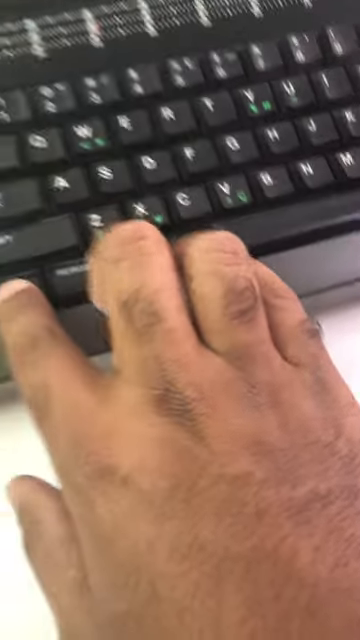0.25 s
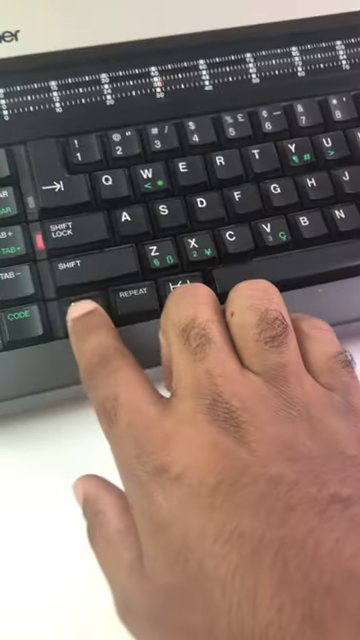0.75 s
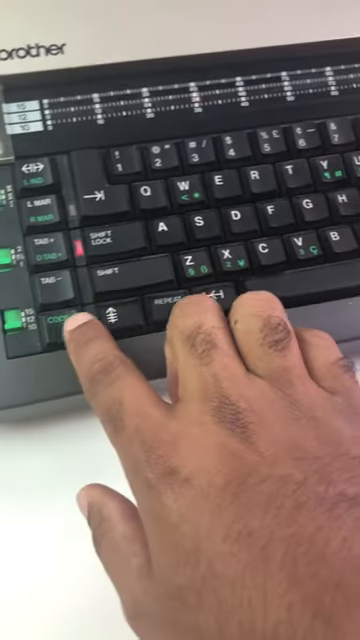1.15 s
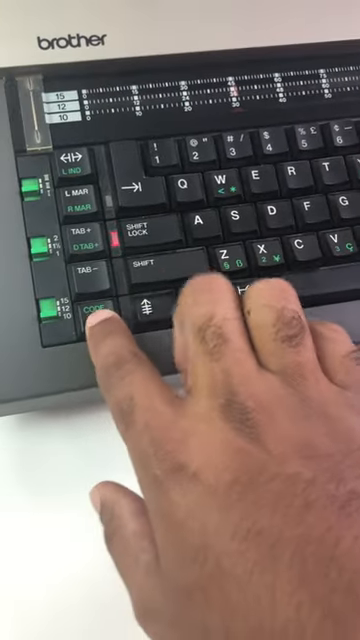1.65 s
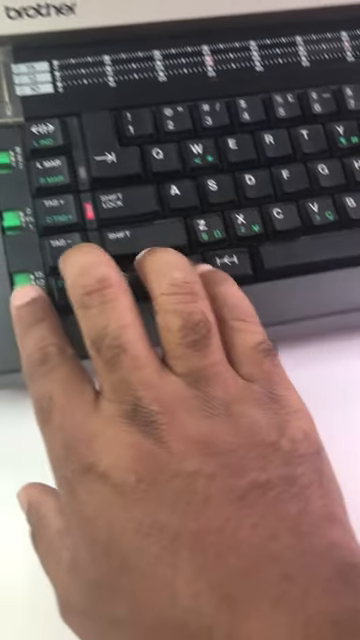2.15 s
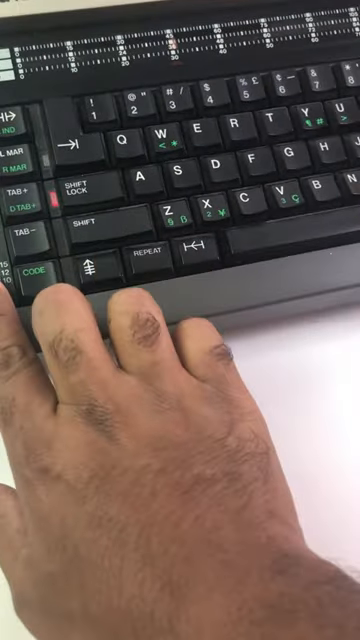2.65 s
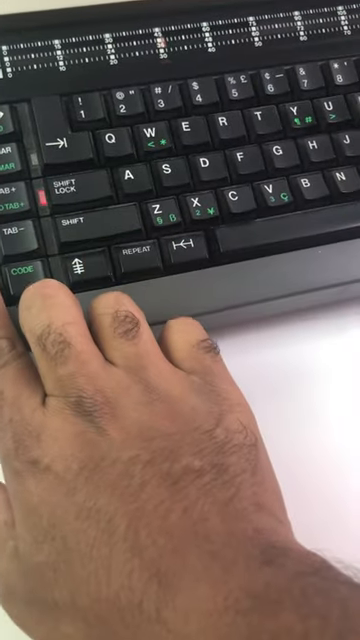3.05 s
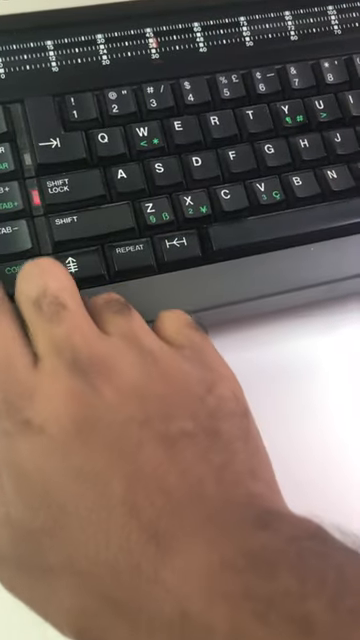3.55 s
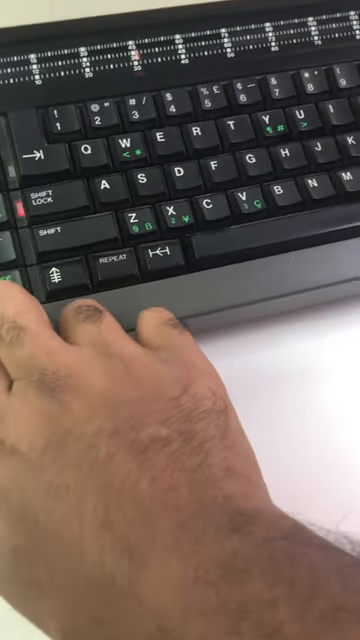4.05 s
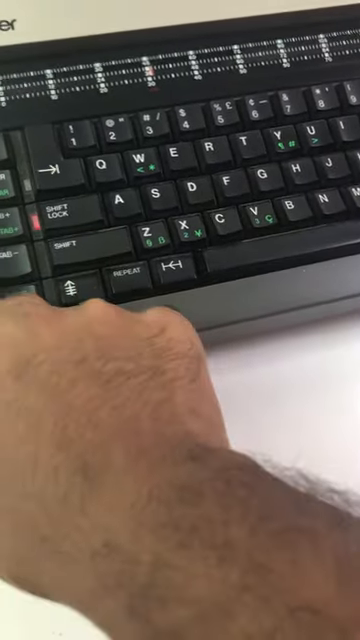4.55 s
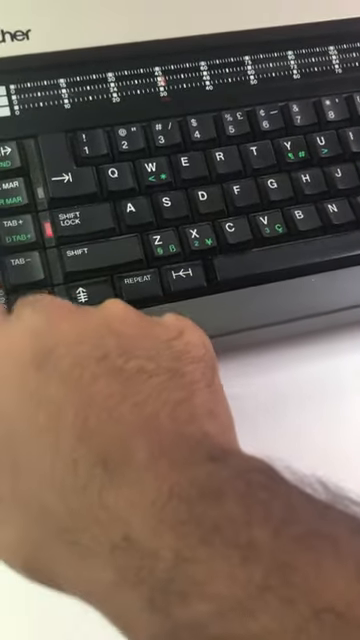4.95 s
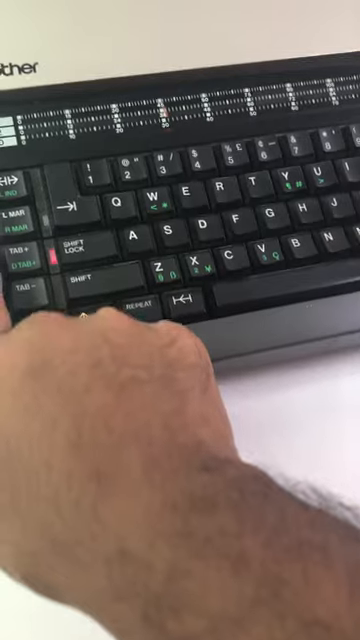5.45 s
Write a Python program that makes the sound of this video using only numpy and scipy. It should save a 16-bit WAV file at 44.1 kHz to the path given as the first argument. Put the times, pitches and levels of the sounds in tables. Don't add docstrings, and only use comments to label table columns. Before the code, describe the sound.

Quiet room air with faint hum opens, joined by a barely audible high whistle that soon stops. Soft, cushioned key contacts patter briefly, followed by sparse touches and tiny fingertip squeaks. Then small switches snap sharply, with bright ticks, plastic rattle and dull desk thumps, unevenly spaced and stronger near the end. Close phone pickup, mono, short room reflections, level dipping slightly after loud blows.

```python
import sys
import numpy as np
from scipy import signal
from scipy.fft import rfft, irfft, next_fast_len
from scipy.io import wavfile
from scipy.ndimage import uniform_filter1d, map_coordinates

SR = 44100
rng = np.random.default_rng(int(sys.argv[2]) if len(sys.argv) > 2 else 0)


def makeup_ratio(level_db):
    decades = np.asarray(level_db, float) / 20
    return 10 ** decades


def file_out(sig):
    cols = np.atleast_2d(sig).T
    lim = np.clip(cols, -1, 1)
    pcm = np.round(lim * 32767).astype(np.int16)
    wavfile.write(sys.argv[1], SR, pcm)


N = 251811

# pitch_hz, density_db (per Hz)
RUMBLE_COLOUR = [(12, -61), (20, -60), (48, -6), (81, -10), (168, -2), (261, -6), (296, -11), (397, -9.5),
                 (435, -12), (1600, -23.5), (2080, -37), (3520, -120)]
HISS_COLOUR = [(590, -32), (1000, -52), (1300, 8.5), (1460, -9), (1800, -3), (2380, -4.5), (2890, -5.5),
               (4140, -9.5), (4590, -11), (15800, -23.5)]
# pitch_hz, width_hz, level_db
HUMS = [(63, 13, -78.5), (219, 30, -81), (295.3, 11, -69.5), (868, 18, -76.5), (1240, 9.6, -84.5),
        (2496, 14, -85)]
# pitch_hz, stop_s, level_db
WHISTLE = (14890, 0.43, -88)
# time_s, level_db
NEARNESS = [(0, -1), (.7, 0), (1.05, 1.5), (1.4, -.5), (2.4, -0.5), (5.71, 1.5)]
# pitch_hz, t60_s
ROOM_DECAY = [(100, 1), (500, 0.28), (2000, 0.2), (6000, 0.24), (15000, 0.11)]
# start_s, level_db, rise_s
PUSHES = [(.93, -51, 0.017), (1.04, -51.5, 0.019), (1.159, -53, 0.031), (2.54, -60.5, 0.013),
          (2.898, -50, .008), (3.3484, -30.5, 0.0011), (3.362, -46, 0.013), (3.8, -54.5, 0.02),
          (4.08, -59.5, .018), (4.62, -57, 0.015), (4.82, -50, 0.02), (5.4, -55, 0.015), (5.54, -51, 0.014)]
# centre_s, length_s, pitch_hz, width_hz, level_db
SQUEAKS = [
    (1.553, 0.02, 9500, 700, -69.5),
    (1.55, .03, 15000, 1210, -74),
    (1.737, 0.034, 9360, 500, -75.5),
    (1.86, 0.078, 15400, 500, -82),
    (1.895, 0.11, 9600, 300, -84),
    (2.27, 0.041, 13000, 1800, -76),
    (2.33, .025, 15100, 900, -75),
    (3.55, 0.022, 13200, 1800, -67.5),
    (4.317, 0.02, 13000, 1200, -62.5),
    (5.003, 0.011, 13200, 1800, -70),
]
# start_s, clack_db, tick_db (hardness, over the clack), knock_db (weight, over the clack)
SOFT_KEYS = [(0.8452, -60.5, -18, -3), (0.8709, -45.5, -9.5, -13), (0.9053, -54, -18, -2),
             (0.9179, -48.5, -17, -1), (0.9385, -50.5, -16, -3.5), (1.0132, -45, -16, -1.5),
             (1.0275, -46.5, -12, -3), (1.046, -52, -13, -2), (1.1192, -53, 3, 4),
             (1.1537, -50.5, -18, 3.5), (1.1593, -57, -27, 2.5), (1.5474, -49, -10, -10.5),
             (1.7036, -76, 10, -12), (1.7551, -63, -14, 8.5), (2.0113, -53.5, -8, 5), (2.022, -65, -5, 11),
             (2.0463, -60, -20, -18), (2.3242, -75, 9, 7), (2.6612, -53, -17, 0.5), (2.7304, -66, -18, -2)]
SLIDE_SWITCHES = [(2.8116, -37, -2.5, -12), (2.82, -33.5, -7.5, -6), (2.8932, -31.5, 3, -4.5),
                  (3.3284, -32, -4, -9), (3.3549, -30.5, 3.5, -11), (3.5271, -51, -40, 3.5),
                  (3.702, -55.5, -28, -4), (3.7932, -36, -7.5, -10), (3.8885, -29.5, 2.5, -1.5),
                  (4.0275, -36, -3.5, -9.5), (4.0669, -27.5, 0, -22), (4.2687, -55, -20, 0.5),
                  (4.2958, -44.5, -12, -16), (4.318, -63, -12, 14), (4.4853, -52.5, -1, 6),
                  (4.5028, -47, -30, -2), (4.5228, -37.5, -1.5, -12.5), (4.5957, -28.5, 0.5, -3.5),
                  (4.6219, -36.5, 1, -18), (4.8049, -27.5, 8, -21.5), (4.923, -47.5, -43, -6),
                  (4.9715, -51, -25, -3), (4.979, -60, -2, 3), (4.984, -48.5, -46, -15),
                  (5.231, -59.5, -17, 4.5), (5.2576, -30, -25, -11.5), (5.2664, -40, -2.5, -6.5),
                  (5.3757, -26, 1.5, -5.5), (5.5177, -17, 3.5, -11), (5.7044, -47, -17.5, -7)]
LIGHT_TOUCHES = [(2.542, -63, -21, -13), (3.7645, -56, -6, -11), (4.782, -71, 2, 10),
                 (3.3259, -44.5, -14, -2), (3.3458, -37.5, -3, -5), (3.7866, -37.5, -23, -12),
                 (3.883, -47, -19, -10), (4.012, -65, -15, -18), (4.065, -34, -1, 1.5),
                 (4.5877, -46, -15, -3), (4.7999, -28.5, -10, -2.5), (5.3742, -32.5, -38, -2.5)]
# pitch_hz, width_hz, level_db
DETENT_MODES = [(5790, 270, -20), (7450, 1170, -18), (9240, 700, -17.5), (9820, 700, -22.5),
                (11590, 1430, -10.5), (13000, 4800, -13.5), (15000, 1070, -12.5)]
SLIDER_MODES = [(2595, 67, 0.5), (3000, 290, 6), (3383, 790, 1.5), (4160, 1400, -4.5), (4553, 105, -6),
                (4800, 1100, -11)]
CASE_MODES = [(1270, 118, 1), (1710, 700, 1), (2000, 130, -3), (1920, 390, 2), (2377, 360, 5.5)]
DECK_MODES = [(447, 35, -2.5), (548, 55, -4), (749, 146, -1), (947, 53, 1.5), (1039, 250, -4.5)]
DESK_MODES = [(101.2, 19.7, 7.5), (163, 64, -0.5), (245, 26.6, 7), (354, 97, 2)]
# delay_s, contact_s, level_db, chatter_t60_s, chatter_db
BLOWS = [
    (.0006, 0.00019, 5, 0.035, -16.5),
    (.001, 0.0007, 4.5, 0.046, -11),
    (.0012, 0.00062, 1, 0.057, -15),
    (.0012, .001, 3.5, .08, -10),
    (.0018, 0.0038, 2.5, 0.13, -3),
]

TAIL = 12000
USUAL_DB = -46
TOP_HZ, LOUD_TOP_HZ = 15800, 16800


def unit(x):
    return x / np.sqrt(np.mean(x ** 2) + 1e-20)


def along(points, hz):
    f, value = np.transpose(points)
    return np.interp(np.log(hz + 1), np.log(f + 1), value)


def wobble(rate_hz):
    knots = rng.standard_normal(int(N * rate_hz / SR) + 4)
    return map_coordinates(knots, [np.arange(N) * rate_hz / SR])


def filtered(x, response):
    size = x.shape[-1]
    m = next_fast_len(size + 8192)
    spectrum = rfft(x, m) * response(np.fft.rfftfreq(m, 1 / SR))
    return irfft(spectrum, m)[..., :size]


def peak(f, hz, width_hz):
    return 1j * f * width_hz / (hz * hz - f * f + 1j * f * width_hz)


def modes(f, table):
    return sum((-1) ** k * makeup_ratio(db) * peak(f, hz, width) for k, (hz, width, db) in enumerate(table))


def narrow_noise(hz, width_hz):
    return unit(filtered(rng.standard_normal(N), lambda f: peak(f, hz, width_hz) ** 2))


def ventilation():
    z = signal.stft(rng.standard_normal((2, N)), nperseg=512)[2]
    patches = uniform_filter1d(rng.standard_normal(z.shape[1:]), size=6, axis=0)
    patches = uniform_filter1d(patches, size=12, axis=1)
    low, high = signal.istft(z * makeup_ratio(0.9 * unit(patches)), nperseg=512)[1][:, :N]

    def hiss_response(f):
        rumble_share = 1 / (1 + (f / 1400) ** 8)
        return makeup_ratio(along(HISS_COLOUR, f)) * np.sqrt(1 - rumble_share) * (f < TOP_HZ)

    rumble = unit(filtered(low, lambda f: makeup_ratio(along(RUMBLE_COLOUR, f))))
    hiss = unit(filtered(high, hiss_response))
    gusts_db = 0.7 * wobble(6)
    near_db = np.interp(np.arange(N) / SR, *np.transpose(NEARNESS))
    drift_db = 1.4 * wobble(1.385)
    return makeup_ratio(near_db + drift_db) * (makeup_ratio(-61.5 + gusts_db) * rumble + makeup_ratio(-71) * hiss)


def hums():
    return sum(makeup_ratio(db) * narrow_noise(hz, width_hz) for hz, width_hz, db in HUMS)


def whistle():
    t = np.arange(N) / SR
    hz, stop_s, db = WHISTLE
    fade = np.clip((stop_s - t) / 0.02, 0, 1)
    return makeup_ratio(db + 1.5 * wobble(14)) * np.sin(2 * np.pi * hz * t) * fade


def pushes():
    t = np.arange(N) / SR

    def band(f):
        low, high = 1j * f / 80, 1j * f / 300
        return (low / (1 + low) / (1 + high)) ** 2

    load = np.zeros(N)
    for start_s, db, rise_s in PUSHES:
        u = np.clip(t - start_s, 0, 1) / rise_s
        load += makeup_ratio(db) * u * np.exp(1 - u)
    swell = unit(filtered(rng.standard_normal(N), band)) * load
    shove = 0.76 * filtered(load, band)
    return swell - shove


def squeaks():
    t = np.arange(N) / SR
    out = np.zeros(N)
    for centre_s, length_s, hz, width_hz, db in SQUEAKS:
        puff = np.exp(-4 * ((t - centre_s) / length_s) ** 2)
        out += makeup_ratio(db) * narrow_noise(hz, width_hz) * puff
    return out


def echoes(count):
    hz, t, z = signal.stft(rng.standard_normal((count, TAIL)), SR, nperseg=256)
    decay = makeup_ratio(-60 * t / along(ROOM_DECAY, hz)[:, None])
    tails = signal.istft(z * decay, SR, nperseg=256)[1][:, :TAIL]
    return tails / np.linalg.norm(tails, axis=1, keepdims=True)


def detent(f):
    return modes(f, DETENT_MODES) * peak(f, 9400, 5600)


def slider(f):
    return modes(f, SLIDER_MODES) * peak(f, 3660, 4700)


def case(f):
    return modes(f, CASE_MODES) * peak(f, 900, 2200)


def deck(f):
    return modes(f, DECK_MODES) * peak(f, 550, 830)


def desk(f):
    return modes(f, DESK_MODES) * peak(f, 227, 620)


def bending(f):
    return np.exp(-1j * 0.3756 * np.sqrt(f) + 2j * np.pi * f * 0.000204)


def contacts(table, slack, sharp, loose_db, wet_db, snap_db, thump_db):
    start_s, clack_db, tick_db, knock_db = np.transpose(table)[:, :, None]
    count = len(table)
    strength_db = clack_db - USUAL_DB
    snap_db = snap_db + 0.29 * tick_db - 0.059 * strength_db
    thump_db = thump_db - 0.34 * strength_db + 0.2 * knock_db
    t = np.arange(TAIL) / SR
    rattle = rng.standard_normal((count, 5, TAIL))
    spurts = uniform_filter1d(rng.standard_normal((count, TAIL)), size=60, axis=1)
    spurts = makeup_ratio(5.3 * unit(spurts))
    bodies = (detent, slider, case, deck, desk)
    levels_db = (tick_db, snap_db, 0, knock_db, thump_db)
    hits, radiated = 0, 0
    for k, (body, over_db, settings) in enumerate(zip(bodies, levels_db, BLOWS)):
        delay_s, contact_s, db, chatter_t60_s, chatter_db = settings
        u = np.clip(t - delay_s, 0, None) / max(slack * contact_s, 1 / SR)
        chatter_db = chatter_db + loose_db - 0.077 * strength_db - 60 * t / chatter_t60_s
        chatter = spurts * makeup_ratio(chatter_db) * (1 - np.exp(-u))
        drive = rattle[:, k] * (u * np.exp(1 - u) + chatter)
        click = 1.0 * (np.arange(TAIL) == round(delay_s * SR))
        blow = sharp * np.linalg.norm(drive, axis=1, keepdims=True) * filtered(click, bending)
        ring = filtered(drive + blow, body)
        ring = makeup_ratio(clack_db + over_db + db) * ring / np.abs(ring).max(axis=1, keepdims=True)
        hits = hits + ring
        colour = filtered(1.0 * (np.arange(TAIL) == 200), body)
        energy = np.linalg.norm(ring, axis=1, keepdims=True)
        radiated = radiated + colour * energy / np.linalg.norm(colour)
    room = signal.fftconvolve(radiated, echoes(count), axes=1)[:, :TAIL]
    hits = hits + makeup_ratio(wet_db) * room
    out = np.zeros(N + TAIL)
    starts = np.round((start_s[:, 0] - 0.0006) * SR).astype(int)
    for start, hit in zip(starts, hits):
        out[start:start + TAIL] += hit
    return out[:N]


def keys():
    return contacts(SOFT_KEYS, slack=2.6, sharp=0.44, loose_db=11.5, wet_db=-10,
                    snap_db=0.0, thump_db=-3.5)


def switches():
    return contacts(SLIDE_SWITCHES + LIGHT_TOUCHES, slack=1.0, sharp=0.68, loose_db=12.5, wet_db=-15.5,
                    snap_db=-1.9, thump_db=-6.5)


def scene():
    room = ventilation() + hums() + whistle()
    return (room + pushes() + squeaks() + keys() + switches())[None]


def ducked(x):
    keep = np.exp(-1 / (0.2 * SR))
    power = signal.lfilter([1 - keep], [1, -keep], x ** 2)
    heard_db = 10 * np.log10(power + 1e-12)
    excess_db = np.clip(heard_db + 44.5, 0, None)
    return x * makeup_ratio(-0.28 * uniform_filter1d(excess_db, size=441, origin=220))


def band_limited(x):
    def step(f, hz):
        return 1 / (1 + np.exp(np.clip((hz - f) / 40, -40, 40)))

    return filtered(x, lambda f: makeup_ratio(-9 * step(f, TOP_HZ) - 40 * step(f, LOUD_TOP_HZ)))


def roll_off(x):
    return signal.sosfilt(signal.butter(12, 16950, fs=SR, output="sos"), x)


def record(dry):
    mix = band_limited(ducked(dry))
    return roll_off(mix)


dry = scene()
out = record(dry)
file_out(out)
```